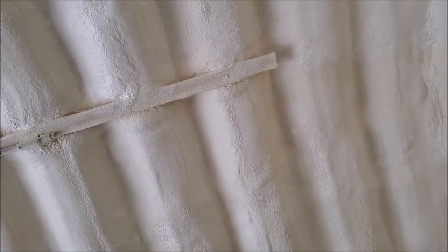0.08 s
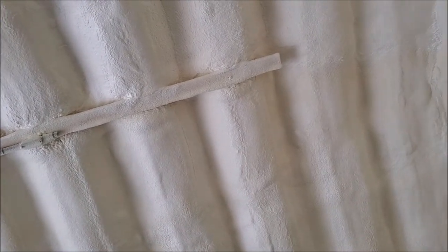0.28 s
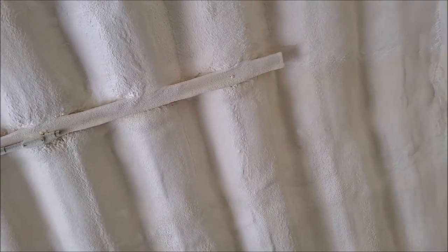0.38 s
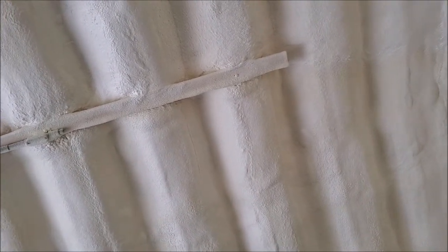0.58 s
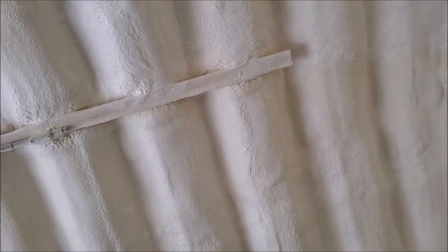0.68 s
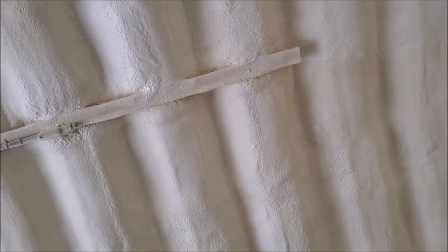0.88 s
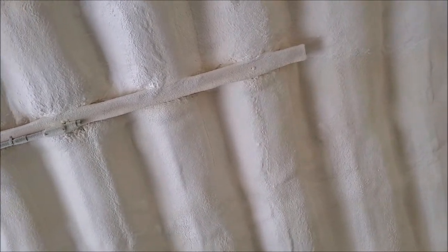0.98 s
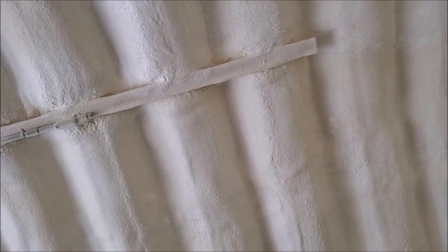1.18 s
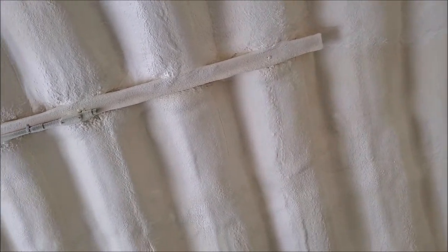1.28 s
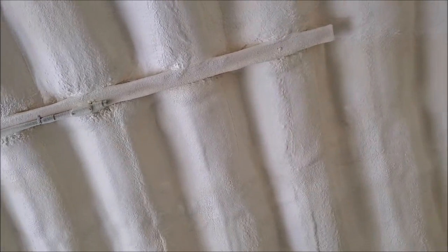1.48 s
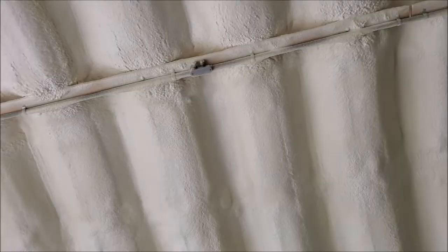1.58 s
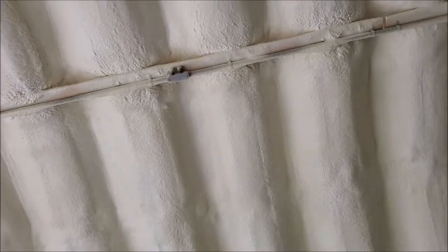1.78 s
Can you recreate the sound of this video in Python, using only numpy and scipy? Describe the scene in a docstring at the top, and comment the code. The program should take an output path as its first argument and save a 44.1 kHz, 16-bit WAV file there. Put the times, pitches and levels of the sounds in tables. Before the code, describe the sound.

A loud, dry crack of hardened foam tearing from a metal roof strikes at 0.2 seconds, over the dying tail of an earlier crack. It is bright and splintery, stronger on the left, with a short hollow thud. Hard wall slaps and dull booms crowd in until about 0.6 seconds, roof panels ring low and unsteadily, and the large building's reverberation fades by about 1.3 seconds into faint rumble and thin high hiss.

```python
"""Inside a large metal building, hardened foam tears loose from a steel roof with one sharp crack.
The snap is two damped tones and a bright noise splinter; the freed panel kicks as a decaying sine.
Wall slaps, surging booms and a dense wash are shaped noise; the roof panels ring as unsteady modes.
An earlier crack is still dying away at the start; under it all lie a faint rumble and a narrow hiss."""
import sys
import numpy as np
from scipy import signal
from scipy.fft import rfft, irfft, next_fast_len
from scipy.io import wavfile
from scipy.ndimage import uniform_filter1d, map_coordinates

SR = 44100
rng = np.random.default_rng(int(sys.argv[2]) if len(sys.argv) > 2 else 0)


def to_wav(s):
    """Save 16-bit WAV."""
    ch = np.atleast_2d(s).T  # columns
    pcm = np.round(np.clip(ch, -1, 1) * 32767)  # PCM
    wavfile.write(sys.argv[1], SR, pcm.astype(np.int16))


N = 79380

# Spectrum of the rumble before its swell and pan. Each row: frequency in Hz, density in dB per Hz.
RUMBLE = [(25, -108), (45, -98), (60, -89), (85, -93.5), (125, -101), (240, -100), (380, -107), (700, -119),
          (2000, -140)]
# Level of the rumble over time. Each row: time in seconds, level in dB.
RUMBLE_LEVEL = [(0, 0), (.9, 2.5), (1.06, -6.5), (1.24, -2), (1.36, -4), (1.47, 0), (1.62, 0), (1.72, 1.5),
                (1.8, -1)]
# Spectrum of the steady hiss. Each row: frequency in Hz, density in dB per Hz.
HISS = [(300, -125), (850, -120), (1150, -112), (2000, -117), (3000, -116), (4400, -116), (5000, -101),
        (5500, -88), (6150, -104), (6750, -108), (7400, -123), (8100, -114), (8900, -112), (10500, -123),
        (15500, -125)]
# Remainder of the earlier crack at the start. Each row: frequency in Hz, density in dB per Hz.
EARLIER_CRACK = [(30, -92.5), (70, -83), (100, -76), (150, -87), (200, -85.5), (240, -78), (300, -75),
                 (450, -77), (600, -81.5), (1150, -79.5), (1900, -94.5), (2700, -87), (4000, -92.5),
                 (6200, -91), (7500, -118), (9000, -111), (12000, -122)]
# Likeness of left and right in the building. Each row: frequency in Hz, coherence from -1 to 1.
COHERENCE = [(40, 0.93), (110, 0.99), (200, .9), (380, 0.85), (700, 0.22), (1300, -.05), (3000, 0)]
# Colour of the crack as it fills the building. Each row: frequency in Hz, density in dB per Hz.
CRACK_COLOUR = [(25, -102), (58, -73.5), (82, -82), (105, -68), (135, -75), (165, -64), (210, -64.5),
                (270, -60), (470, -54.5), (590, -61.5), (1250, -63.5), (2000, -60.5), (3000, -61.5),
                (3700, -62.5), (4800, -59.5), (6100, -62.5), (6700, -71), (7400, -82.5), (8800, -74.5),
                (10000, -78.5), (11000, -88.5), (12200, -87.5), (14300, -102), (15600, -120)]
# Reverberation of the building. Each row: frequency in Hz, T60 in seconds.
HALL_T60 = [(60, 0.89), (130, 1.25), (250, 1.2), (450, 1.1), (700, 0.99), (1300, 0.51), (2200, 0.54),
            (3000, 0.55), (5500, 0.6), (9000, 0.55), (14000, 0.4)]
# Time constant of the wash's growth. Each row: frequency in Hz, time in seconds.
BUILD_UP = [(60, 0.04), (150, 0.028), (400, .005), (1500, 0.0039), (6000, 0.0011)]
# Time that wash and panels hold before they fall. Each row: frequency in Hz, time in seconds.
HOLD = [(100, 0.11), (500, 0.068), (900, 0.16), (2000, 0.17), (3500, 0.24), (6000, .13), (10000, 0.09)]
# Returns of the panels' boom from the far walls. Each row: start in seconds, level in dB per Hz
# to which the boom colour is added.
BOOMS = [(0.282, -53.5), (0.396, -53), (.487, -59), (0.554, -65), (0.614, -66), (0.791, -75),
         (0.977, -85.5)]
# Colour of the booms. Each row: frequency in Hz, relative level in dB.
BOOM_COLOUR = [(100, -29), (250, -11), (450, 0.5), (600, -4.5), (1000, -20), (2500, -53)]
# Distinct wall echoes. Each row: start in seconds, level in dB over the crack colour.
ECHOES = [(0.2265, 0.5), (0.2514, -1.5), (.259, -7.5), (.2645, -4), (0.27, 4), (0.2903, -1), (0.4094, -10)]
# Modes of the roof panels. Each row: frequency in Hz, level in dB, T60 in seconds.
PANEL_MODES = [(253, -47, 1.25), (331, -42, 1.3), (374, -45, 1.1), (400, -39.5, 1.2), (439, -40, 1.2),
               (467, -40, 1.1), (494, -42, 1.0)]
# Bursts of the breaking foam. Each row: frequency in Hz, level in dB, time to peak in seconds.
SNAP_BURSTS = [(4950, -6.5, 0.00081), (1680, -24.5, .0021)]
# The snap and its bounces off the nearest surfaces. Each row: delay in seconds, level in dB.
BOUNCES = [(0, 0), (.0011, -10), (.0056, -11)]
# Shading of the right microphone. Each row: frequency in Hz, level against the left in dB.
RIGHT_SHADE = [(50, 3.5), (140, 1.5), (220, -1), (500, -3), (900, -1), (3000, -.5), (3700, -6.5),
               (5500, -14.5), (6400, -9), (7300, -8.5), (8700, -12), (10000, -9.5), (11200, 0), (15000, -1)]
# Low mids handled by the noise suppressor. Each row: frequency in Hz, share from 0 to 1.
QUIET_BAND = [(120, 0.092), (230, 1), (550, 0.88), (850, 0.17)]

RUMBLE_SWELL_DB, RUMBLE_SWELL_RATE = 1.2, 7.8  # dB per unit of wobble, knots a second
RUMBLE_PAN_DB = 2  # taken from the left, added to the right
GRAIN_DB, GRAIN_RATE = 1.0, 450  # dB per unit of wobble, knots a second
BOOM_RISE_S, BOOM_T60_S = 0.008, 0.18
ECHO_RISE_S, ECHO_T60_S = 0.0002, 0.034
ECHO_LOW_HZ, ECHO_HIGH_HZ = 180, 8000  # the slaps carry no deep bass and little top
PANEL_RISE_S, PANEL_WANDER_RAD, PANEL_WANDER_RATE = 0.008, 0.6, 18  # rate in knots a second
THUD_HZ, THUD_DB, THUD_RISE_S, THUD_T60_S = 470, -24, 0.003, 0.09
CRACK_S = 0.2036
SNAP_SHAPE = 4  # exponent that narrows each burst's envelope
SPLINTER_DB, SPLINTER_RISE_S, SPLINTER_T60_S = 20, 0.0003, 0.0052  # level over the crack colour
RIGHT_LAG_S, RIGHT_DB = 0.000083, -7
QUIET_DB, QUIET_KNEE_DB, QUIET_DEPTH_DB = -71, 1.0, 5
TOP_HZ = 15650  # band limit


def amp(db):
    """Decibel law: level to amplitude ratio."""
    return 10 ** (np.asarray(db) / 20)


def along(points, hz):
    """Linear interpolation of (Hz, value) points on a logarithmic frequency axis."""
    f, value = np.transpose(points)
    return np.interp(np.log(hz + 1), np.log(f + 1), value)


def since(start):
    """Causality: seconds elapsed since a moment, zero before it."""
    return np.maximum(np.arange(N) / SR - start, 0)


def wobble(rate):
    """Random modulation: a smooth spline through random knots, rate of them a second."""
    knots = rng.standard_normal(N // 8)
    return map_coordinates(knots, [np.arange(N) * rate / SR], mode="wrap")


def filtered(x, response):
    """Linear filtering: the spectrum of x times a response of frequency."""
    m = next_fast_len(N + SR // 2)
    hz = np.fft.rfftfreq(m, 1 / SR)
    return irfft(rfft(x, m) * response(hz), m)[..., :N]


def noise(spectrum):
    """Spatial coherence: two independent noises mixed as mid and side, with a given density."""
    def mid_side_gains(hz):
        angle = np.arccos(np.clip(along(COHERENCE, hz), -1, 1)) / 2
        return amp(along(spectrum, hz)) * [np.cos(angle), np.sin(angle)]

    white = rng.standard_normal((2, N)) * np.sqrt(SR / 2)  # unit power per Hz
    mid, side = filtered(white, mid_side_gains)
    return np.array([mid + side, mid - side])


def by_band(x, envelope, count=20):
    """Frequency-dependent decay: overlapping bands of x, each with the envelope of its centre."""
    centres = np.geomspace(40, TOP_HZ, count)
    m = next_fast_len(N + SR // 4)
    spectrum, hz = rfft(x, m), np.fft.rfftfreq(m, 1 / SR)
    total = np.zeros((2, N))
    for centre, pick in zip(centres, np.eye(count)):
        weight = along(np.c_[centres, pick], hz)
        total += irfft(spectrum * weight, m)[:, :N] * envelope(centre)
    return total


def swell(t, rise, t60, hold=0):
    """Exponential growth and decay, with a rounded hold between them."""
    fall_time = np.hypot(t, hold) - hold
    return (1 - np.exp(-t / rise)) * amp(-60 * fall_time / t60)


def background():
    """Stationary coloured noise: a hiss with a narrow peak, over a rumble of wandering level."""
    level_db = np.interp(since(0), *np.transpose(RUMBLE_LEVEL))
    level_db = level_db + RUMBLE_SWELL_DB * wobble(RUMBLE_SWELL_RATE)
    pan = amp([[-RUMBLE_PAN_DB], [RUMBLE_PAN_DB]])
    return noise(RUMBLE) * amp(level_db) * pan + noise(HISS)


def earlier_crack():
    """Free decay of a reverberant field: only the fading remainder of the crack before."""
    t = since(0)
    return by_band(noise(EARLIER_CRACK), lambda hz: amp(-60 * t / along(HALL_T60, hz)))


def wash():
    """Diffuse reverberation: bass builds slowly, lows last longest, reflections roughen the level."""
    t = since(CRACK_S)

    def envelope(hz):
        return swell(t, along(BUILD_UP, hz), along(HALL_T60, hz), along(HOLD, hz))

    tail = by_band(noise(CRACK_COLOUR), envelope)
    grain = np.array([wobble(GRAIN_RATE), wobble(GRAIN_RATE)])
    return tail * amp(GRAIN_DB * grain)


def booms():
    """Late reflection: the low ring returns in duller surges, their powers added."""
    power = sum((amp(db) * swell(since(s), BOOM_RISE_S, BOOM_T60_S)) ** 2 for s, db in BOOMS)
    return noise(BOOM_COLOUR) * np.sqrt(power)


def echoes():
    """Scattered reflection: the ribbed walls turn each slap into noise, their powers added."""
    def colour(hz):
        low_cut = hz ** 2 / (hz ** 2 + ECHO_LOW_HZ ** 2)
        return low_cut / np.hypot(1, (hz / ECHO_HIGH_HZ) ** 2)

    slap = filtered(noise(CRACK_COLOUR), colour)
    power = sum((amp(db) * swell(since(s), ECHO_RISE_S, ECHO_T60_S)) ** 2 for s, db in ECHOES)
    return slap * np.sqrt(power)


def roof():
    """Modal vibration: the released steel panels ring in a cluster of low, unsteady modes."""
    t, ring = since(CRACK_S), np.zeros((2, N))
    for hz, db, t60 in PANEL_MODES:
        shared = wobble(PANEL_WANDER_RATE)
        drift = shared + np.array([wobble(PANEL_WANDER_RATE), wobble(PANEL_WANDER_RATE)])
        phase = 2 * np.pi * (hz * t + rng.random()) + PANEL_WANDER_RAD * drift
        ring += amp(db) * swell(t, PANEL_RISE_S, t60, along(HOLD, hz)) * np.sin(phase)
    return ring


def thud():
    """Damped oscillation: the panel kicks once as it is let go."""
    t = since(CRACK_S)
    kick = swell(t, THUD_RISE_S, THUD_T60_S) * np.sin(2 * np.pi * THUD_HZ * t)
    return amp(THUD_DB) * kick


def snap():
    """Impulsive fracture: millisecond bursts, nearer the left microphone, and first bounces."""
    t = np.array([since(CRACK_S), since(CRACK_S + RIGHT_LAG_S)])
    burst = np.zeros((2, N))
    for hz, db, rise in SNAP_BURSTS:
        envelope = (t / rise * np.exp(1 - t / rise)) ** SNAP_SHAPE
        burst += amp(db) * envelope * np.sin(2 * np.pi * hz * t)
    splinter = amp(SPLINTER_DB) * noise(CRACK_COLOUR) * swell(t, SPLINTER_RISE_S, SPLINTER_T60_S)
    high_pass = signal.butter(2, 6000, "high", fs=SR, output="sos")
    splinter = signal.sosfilt(high_pass, splinter)
    direct = (burst + splinter) * amp([[0], [RIGHT_DB]])
    return sum(amp(db) * np.roll(direct, round(delay * SR), axis=1) for delay, db in BOUNCES)


def scene():
    """Superposition: the crack, its answers in the building and the background."""
    return snap() + thud() + echoes() + booms() + wash() + roof() + earlier_crack() + background()


def suppress(x):
    """Downward expansion: the low mids are turned down where they lie under a threshold."""
    band = filtered(x, lambda hz: along(QUIET_BAND, hz))
    power = uniform_filter1d(np.mean(band ** 2, axis=0), size=3000)  # 68 ms average
    level_db = 10 * np.log10(np.abs(power) + 1e-14)
    closed = (1 - np.tanh((level_db - QUIET_DB) / (2 * QUIET_KNEE_DB))) / 2
    return x + band * (amp(-QUIET_DEPTH_DB * closed) - 1)


def record(dry):
    """Spectral shading of the right microphone, suppression of quiet low mids, then a band limit."""
    heard = filtered(dry, lambda hz: amp([0 * hz, along(RIGHT_SHADE, hz)]))
    return filtered(suppress(heard), lambda hz: hz < TOP_HZ)


dry = scene()
out = record(dry)
to_wav(out)
```